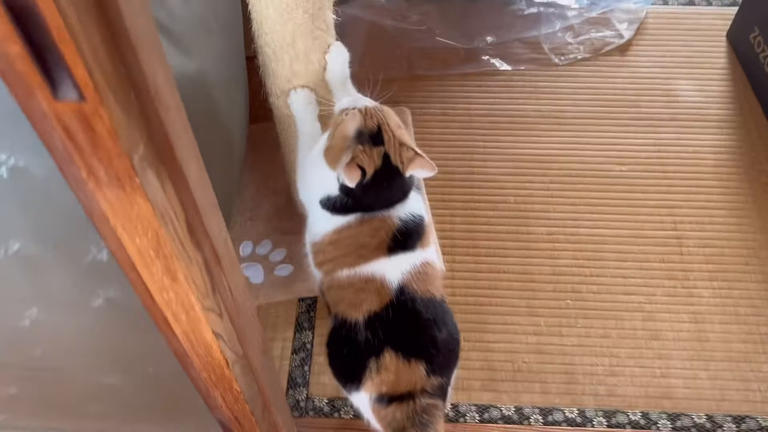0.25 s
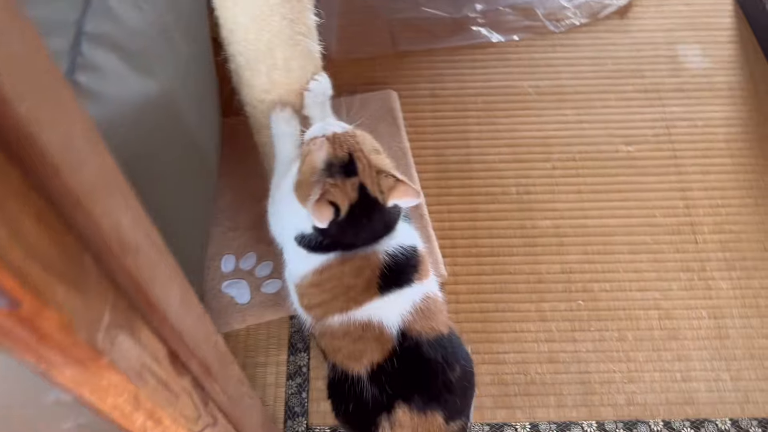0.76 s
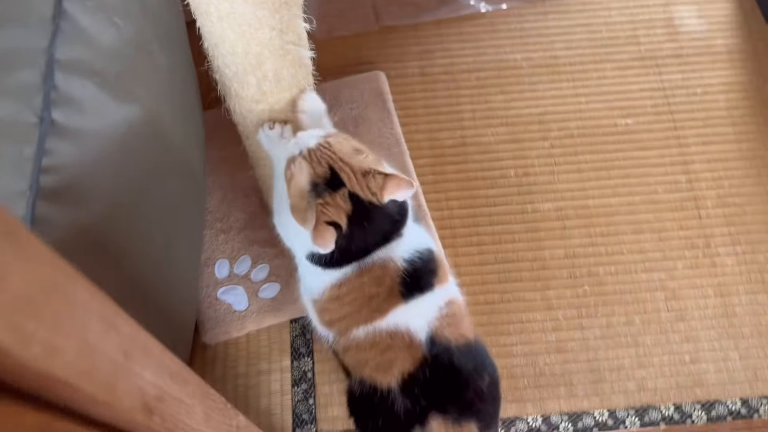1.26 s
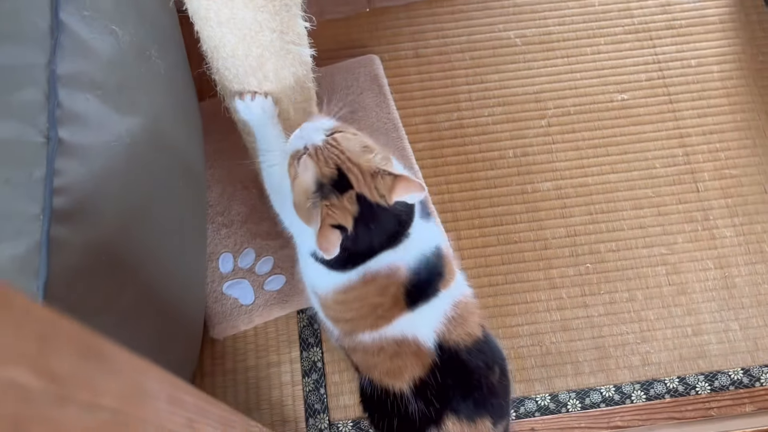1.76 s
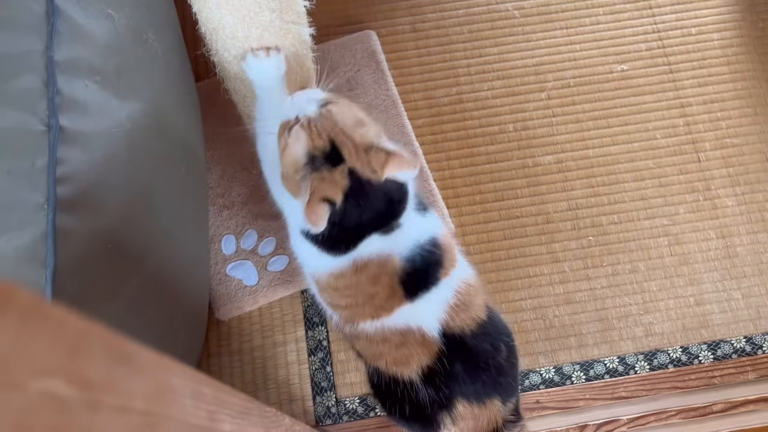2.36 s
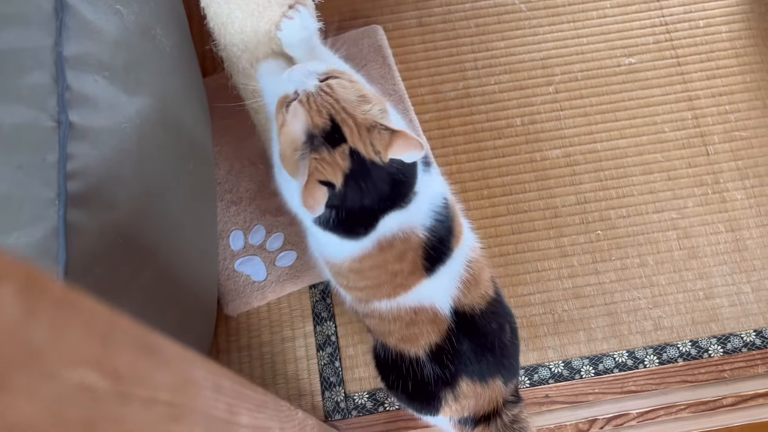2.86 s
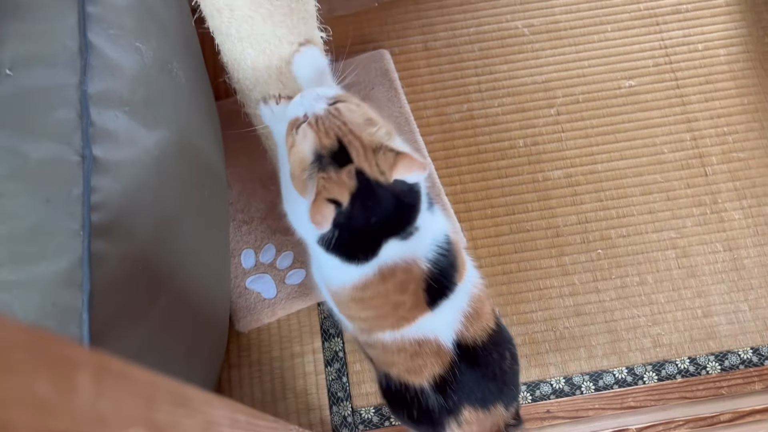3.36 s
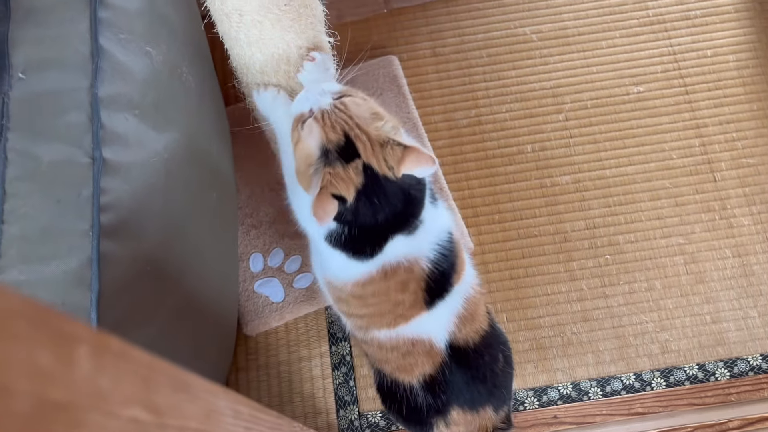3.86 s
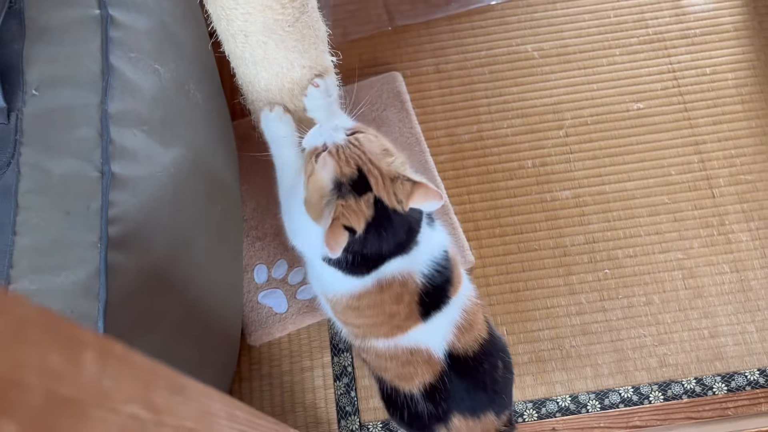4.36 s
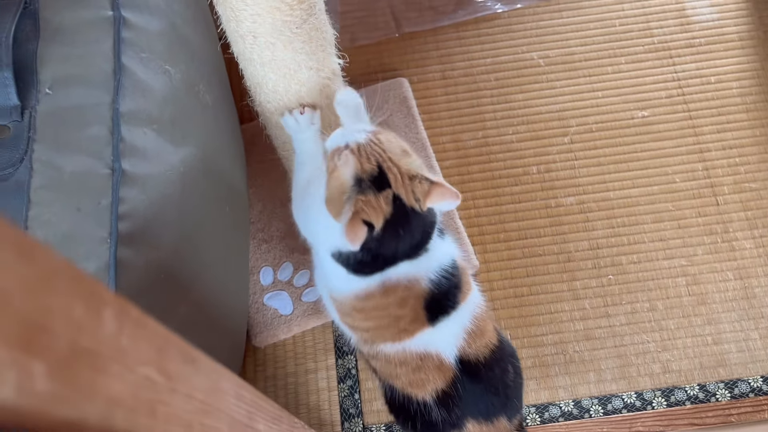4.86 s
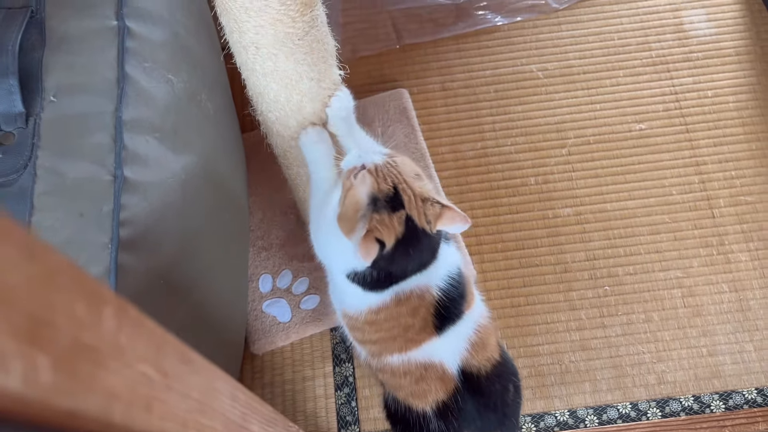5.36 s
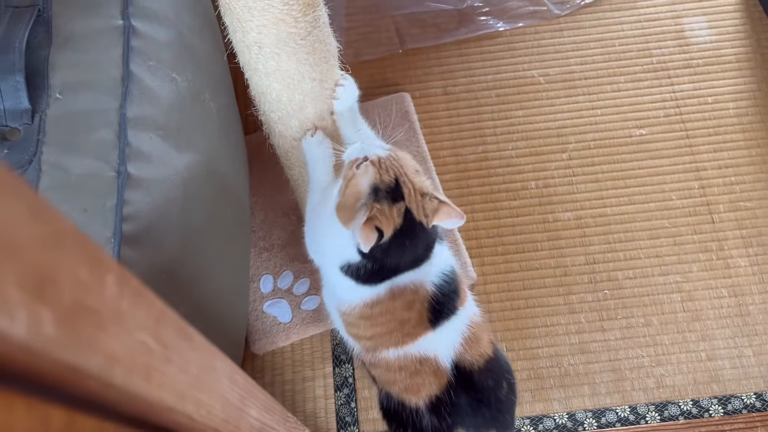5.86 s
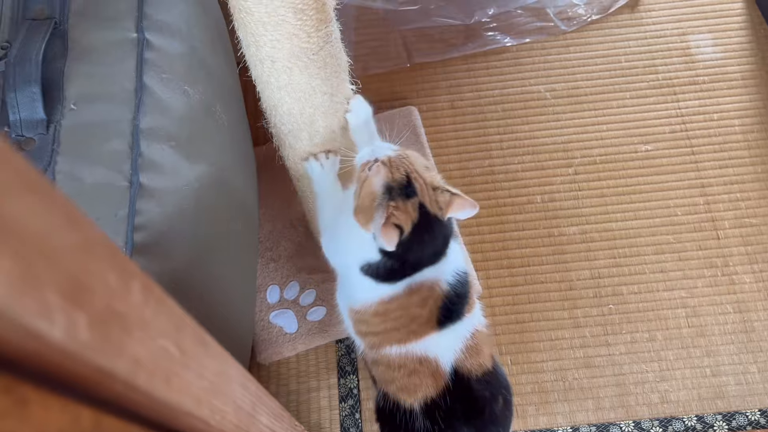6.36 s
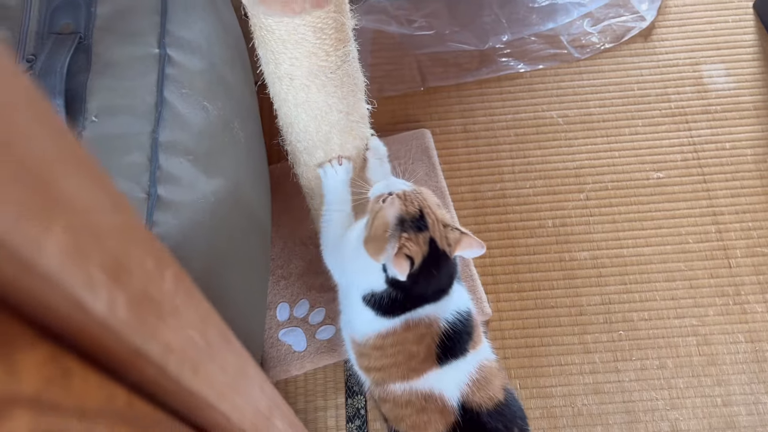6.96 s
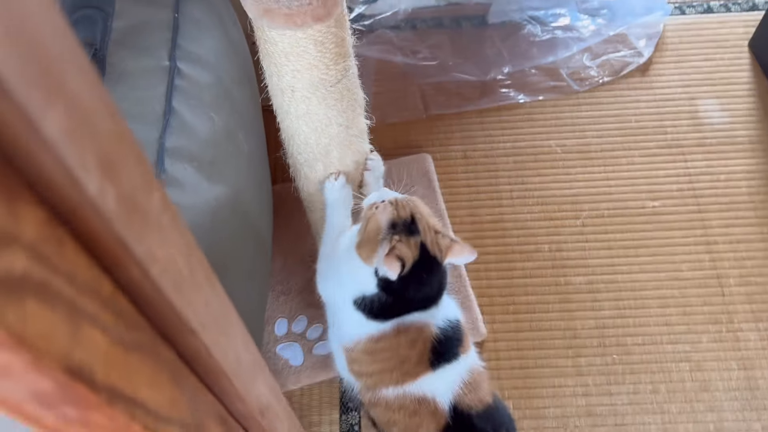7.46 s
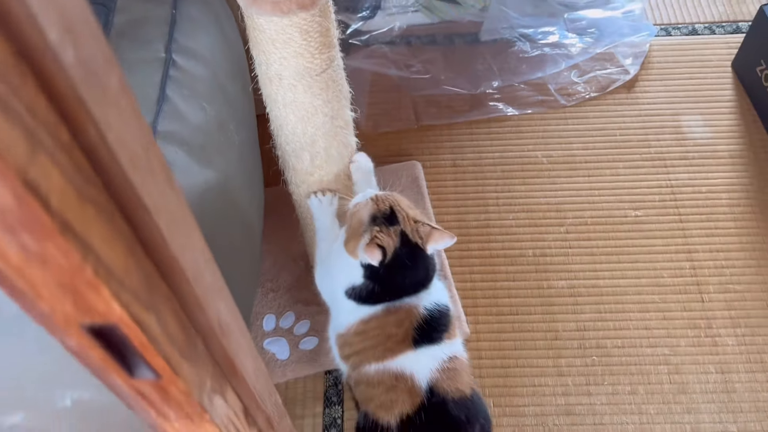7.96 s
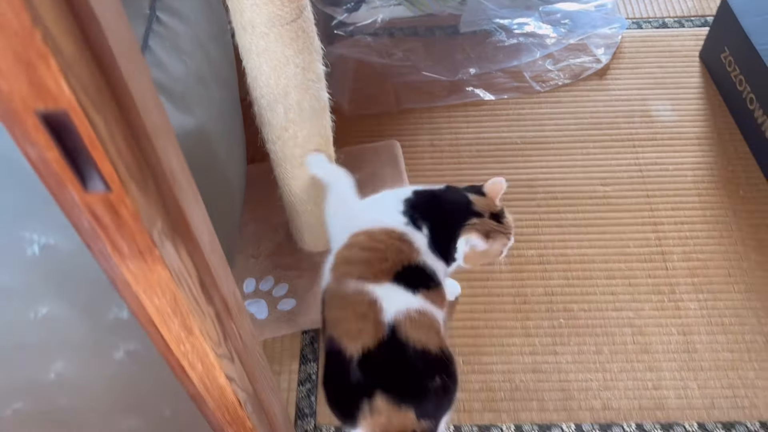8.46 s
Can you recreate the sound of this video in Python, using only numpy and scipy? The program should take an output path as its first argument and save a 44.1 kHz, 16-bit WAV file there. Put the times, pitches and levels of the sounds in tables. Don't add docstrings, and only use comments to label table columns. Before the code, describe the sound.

A cat scratches a rope-wrapped post a metre or two below the listener. Each claw catches, strains and snaps free with a dry hollow pop, followed by short crackling fibre tears and tiny strand clicks. The loose base thuds softly on the matted floor. Strokes come unevenly, busiest around the middle and late part, then stop, leaving faint brushing. Close stereo pickup, small soft room, faint hush.

```python
import sys
import numpy as np
from scipy import signal
from scipy.fft import rfft, irfft, next_fast_len
from scipy.io import wavfile
from scipy.ndimage import uniform_filter1d

SR = 44100
rng = np.random.default_rng(int(sys.argv[2]) if len(sys.argv) > 2 else 0)


def volts_from_db(level):
    exponent = np.asarray(level, float) / 20
    return 10 ** exponent


def master(y):
    cut = np.clip(np.atleast_2d(y).T, -1, 1)
    pcm = np.round(cut * 32767)
    wavfile.write(sys.argv[1], SR, pcm.astype(np.int16))


N = 383209
TIME = np.arange(N) / SR
SIZE = next_fast_len(N + SR)
FREQ = np.arange(SIZE // 2 + 1) * SR / SIZE

# start_s, snap_db, ring_hz, click_db, click_top_db (top band against click)
STROKES = [(0.045, -28.5, 1707, -39, -10), (0.424, -24.5, 1570, -25.5, -36), (0.749, -31.5, 1280, -40, -27),
           (0.894, -33.5, 1630, -29, -2.5), (1.331, -34.5, 930, -79, 22),
           (1.724, -20.5, 1740, -24.5, -22.5), (1.851, -23.5, 1645, -43.5, 3.5), (2.272, -38, 965, -52, 15),
           (2.736, -37.5, 787, -43, 2.5), (2.976, -28.5, 932, -32, 5), (3.155, -26.5, 858, -38, 2),
           (3.271, -37.5, 3020, -41, -1), (3.991, -32.5, 862, -36, 6), (4.367, -28, 1174, -45, 1),
           (4.708, -25.5, 883, -23, -25.5), (5.143, -31, 883, -35, 4), (5.432, -33.5, 974, -26.5, 4),
           (5.978, -28, 1777, -31, -3.5), (6.073, -38, 1136, -57, -10), (6.413, -25.5, 1724, -31, 0.5),
           (6.628, -32.5, 1590, -34, -1), (7.076, -23, 3770, -31, -8), (7.57, -33.5, 1755, -36.5, 5),
           (7.983, -31, 1600, -36.5, 3.5)]
# rip_length_s, post_db, fibre_db, thud_db, thud_hz
AFTER = [(0.091, -60, -92, -47, 104), (0.079, -54.5, -74, -44, 61), (0.021, -54, -53, -49.5, 61),
         (0.11, -50, -49.5, -41, 85.4), (0.03, -50.5, -56, -47, 110), (0.085, -62, -68, -45, 98),
         (0.081, -48, -51.5, -49, 99), (0.046, -47.5, -54.5, -46, 91), (0.2, -69.5, -83, -43, 34),
         (0.094, -58, -59.5, -50, 55), (0.11, -56.5, -58, -42, 67), (0.052, -51.5, -51, -49, 109),
         (0.066, -63.5, -75, -41, 54), (0.031, -63, -86, -51, 160), (0.042, -50, -57, -45, 50.6),
         (0.048, -55.5, -93, -48, 120), (0.053, -58.5, -62, -44.5, 59), (0.077, -59, -84, -46.5, 26),
         (0.045, -68, -62.5, -50, 91), (0.09, -54, -61.5, -39.5, 28), (0.033, -61, -80, -44, 130),
         (0.076, -60, -74, -46, 48), (0.048, -53, -88, -48.5, 110), (0.07, -59, -68, -46, 66)]
# post_jolt_db, base_jolt_db, click_bright_db, second_claw_db, rip_creak_db
GRIP = [(0, -1, -4.5, -7, 0), (0, 0, 0, -1, -1), (0, -8.5, 4, 4, 3.5), (0, -6, -1.5, 5, -3.5),
        (0, -4.5, 1, -1, 1.5), (3, -8, -8, -1, -7), (0, -7, 4.5, -4.5, -1), (0, 5, 15.5, -6, -4),
        (0, 4.5, 6, -9, 2.5), (0, -6.5, -7.5, -4.5, -7), (0, -2.5, 10, -2, -5), (0, 7.5, 5, -1, -2),
        (3, 6, -1, -5, 10.5), (0, 0, -3, -9, -1), (3, -4, -3, -4.5, 3), (0, -4, -8, -6, -0.5),
        (0, 4, 9, -11, -1), (0, 0.5, -7, -3, -3.5), (0, 4, 4, -1, -7), (0, 0.5, 1.5, 3, -1.5),
        (0, -7.5, -3, 0.5, 7), (3, 7, -5, 6, -3), (3, 4, -8, 6.5, 0.5), (0, 2.5, 8.5, -3, 3.5)]
# start_s, snap_db, ring_hz, drag_length_s, fibre_db
CATCHES = [(0.16, -52, 840, 0.033, -69), (0.684, -50.5, 1320, 0.064, -72), (1.441, -55.5, 870, 0.023, -71),
           (1.563, -54, 1030, 0.016, -87), (1.58, -50.5, 2950, 0.022, -66),
           (1.639, -54.5, 1250, 0.08, -66.5), (1.835, -53, 1300, 0.011, -71),
           (1.999, -47, 3830, 0.023, -60.5), (2.09, -46.5, 930, 0.044, -78), (2.255, -56, 920, 0.022, -71),
           (2.405, -49, 916, 0.015, -79), (2.637, -49.5, 1590, 0.1, -69), (3.283, -34.5, 1250, 0.013, -71),
           (3.707, -42, 2640, 0.008, -55), (3.942, -60, 1280, 0.022, -70), (5.788, -45.5, 1280, 0.039, -67),
           (5.88, -42, 1250, 0.052, -60), (6.242, -47, 3600, 0.1, -69), (6.425, -26, 1377, 0.022, -79),
           (6.521, -42, 3770, 0.094, -84), (6.634, -37, 1717, 0.012, -73),
           (6.972, -47.5, 3540, 0.031, -66.5), (7.052, -44.5, 1240, 0.021, -79)]
# start_s, snap_db, ring_hz
SKIPS = [(.905, -37, 1220), (.896, -37, 1580), (.945, -36, 1100), (.949, -30, 930), (1.854, -31, 2100),
         (1.878, -31, 1000), (1.905, -33.5, 890), (1.925, -29.5, 1790), (1.333, -39, 820),
         (7.078, -28.5, 3400), (3.31, -46, 1300), (3.288, -32.5, 1220), (3.296, -31, 1300),
         (3.338, -41, 800), (.424, -31, 3540), (4.709, -27, 3200)]
# start_s, length_s, fibre_db, post_db, swell_db
RUBS = [(0.01, 8.07, -81.5, -87.5, -5.5), (8.08, .6, -92, -92, 8), (5.791, .01, -62, -64, 0),
        (4.195, .025, -70, -82, 0), (3.486, 0.28, -93, -86.5, 5), (0.21, 0.17, -76, -81.5, 10),
        (0.812, 0.065, -75, -76, -14), (1.269, 0.051, -69, -75.5, -2), (1.402, 0.084, -75, -77, -10),
        (2.875, .085, -89, -67.5, 6), (3.097, 0.044, -63.5, -63.5, -4), (3.856, 0.14, -71.5, -75.5, 7),
        (4.127, .16, -73.5, -78, 2), (4.424, 0.061, -72.5, -75, 16.5), (4.563, 0.11, -78, -80, 11.5),
        (4.799, 0.031, -66, -67, -18), (4.918, .12, -67, -72, 5), (5.104, 0.031, -72, -82.5, 3),
        (5.683, 0.045, -63, -67.5, 10), (6.904, 0.068, -72.5, -78.5, -6), (7.279, 0.042, -66, -70, 2),
        (8.33, 0.046, -93, -94, 2), (6.191, .05, -78.5, -90, -4), (8.379, 0.048, -67, -72, 7),
        (8.437, 0.046, -62.5, -67, -7), (8.475, 0.073, -77, -87, -7), (8.55, 0.19, -82.5, -85, 9),
        (2.155, 0.038, -99, -98, -9), (5.497, 0.031, -94, -91, -9), (7.552, 0.018, -68, -68, 10),
        (7.085, 0.041, -74, -76, -10)]
# start_s, length_s, post_db, fibre_db, creak_db (in the base)
LEANS = [(0.498, 0.13, -70.5, -82, -68), (2.33, 0.064, -68, -78, -73), (2.417, 0.23, -73.5, -104, -77.5),
         (2.693, 0.1, -79, -80, -77), (3.36, 0.11, -74, -72, -77), (5.22, 0.066, -90, -73, -85),
         (5.374, 0.092, -78, -68, -66.5), (6.35, 0.053, -68, -61.5, -62), (6.495, 0.11, -56, -61.5, -56.5),
         (6.666, 0.1, -75.5, -94, -63), (7.154, 0.051, -78, -75, -71), (7.342, .1, -75.5, -73.5, -73),
         (7.454, 0.039, -97, -108, -66), (2.89, 0.066, -66.5, -90, -73), (4.764, 0.082, -70, -82, -62.5),
         (7.624, 0.047, -68, -81, -68), (3.552, 0.11, -94, -95, -72), (1.983, 0.022, -61, -62, -75),
         (2.092, 0.015, -65, -74, -72), (2.86, .08, -74, -90, -85), (7.664, 0.11, -68, -71.5, -73),
         (7.876, 0.13, -84, -77, -75.5)]
# start_s, peak_db, top_db (top band against peak)
TICKS = [(0.411, -56.5, 9.5), (0.824, -44.5, -3), (1.841, -47, 3), (2.282, -37, -34), (2.813, -52, -1),
         (3.1397, -54.5, 3), (3.2038, -40.5, -11), (2.9708, -50.5, 5), (4.804, -40.5, -1), (5.8715, -52, 6),
         (5.902, -55, 4), (6.08, -47, -6), (6.292, -60, 0), (6.428, -18.5, -18), (6.536, -42, -4),
         (7.194, -58, 2), (7.439, -57.5, -1), (8.035, -74, 18), (8.165, -78, 7),
         (0.3366, -55, 0), (1.8344, -41.5, -5), (2.0018, -43, -11.5), (2.1071, -54, 2), (2.1154, -52.5, 3),
          (2.1555, -71, -4), (2.1635, -59, 2), (2.2159, -76, -2.5), (3.1083, -53, -4), (3.1577, -25.5, 4.5),
          (3.929, -66, 5), (3.633, -76, 12), (4.4383, -65, 0), (4.4787, -53, -6), (4.6359, -58, 2.5),
          (4.7124, -26.5, -2.5), (4.9282, -68, 3), (5.006, -60, -2), (5.1108, -63, 3), (5.255, -63, 8),
          (5.5244, -61, 2), (5.728, -59, -2), (5.7698, -65, 0), (6.2765, -61, -6), (6.5204, -50, -8.5),
          (6.5514, -49, -2), (6.6065, -50, -10), (6.6374, -42, -8), (6.791, -68, 7), (6.9132, -68, 2),
          (7.2898, -69, 0), (7.3128, -63, 5), (8.0494, -72, -4), (8.118, -66, -2), (8.4437, -60, -4)]
# start_s, length_s, pitch_hz,
# level_db
SQUAWKS = [(0.936, 0.017, 951, -45.5), (0.984, 0.013, 1090, -54), (.897, 0.0066, 1150, -45),
           (1.742, 0.027, 1720, -52), (0.939, 0.025, 1726, -50), (0.948, 0.048, 1334, -51),
           (0.972, 0.017, 1090, -48), (1.006, 0.031, 884, -59.5), (1.865, 0.036, 934, -49),
           (1.897, 0.025, 930, -48.5), (1.913, 0.027, 1620, -50), (2.271, 0.06, 951, -44.5),
           (2.288, 0.041, 990, -60), (3.285, 0.023, 1245, -48.5), (3.295, 0.024, 1614, -54),
           (6.418, 0.024, 202, -47), (6.428, 0.027, 497, -46), (6.543, .03, 369, -49.5),
           (6.652, 0.067, 563, -62), (6.69, .045, 980, -73), (2.746, 0.03, 223, -51.5),
           (2.985, 0.017, 892, -54), (3.163, 0.016, 872, -48), (4.713, 0.045, 500, -48),
           (1.338, 0.021, 992, -52.5), (7.078, 0.017, 230, -49), (7.103, 0.016, 198, -49),
           (6.343, .022, 7700, -70), (6.246, .007, 1400, -54), (6.304, .005, 3600, -64),
           (6.322, .006, 3700, -65), (6.532, .01, 3900, -47), (6.549, .007, 3800, -52),
           (6.603, .008, 3500, -56), (4.711, .014, 1220, -49), (3.888, .005, 1900, -66),
           (7.487, 0.038, 452, -63.5), (7.493, 0.052, 320, -65)]
# start_s, peak_db, pitch_hz
THUDS = [(0.191, -55, 57), (0.388, -47.5, 51.6), (1.677, -56, 52), (2.109, -57, 97), (3.178, -44, 62),
         (3.506, -78, 76), (5.4, -47.5, 92.4), (4.381, -49.5, 46), (5.154, -48.5, 46.5), (5.819, -60, 98),
         (6.372, -49.5, 62.7), (6.441, -34.5, 66.4), (6.517, -32, 47.4), (6.512, -35.5, 93.8),
         (6.532, -31, 95), (7.167, -45.5, 57.6), (7.34, -52, 84), (7.364, -50, 84), (7.735, -60, 68.6),
         (8.439, -64.5, 114), (8.545, -61, 89.5), (8.572, -44.5, 85.8), (8.627, -58, 85)]
# time_s, level_db
SWAY = [(0.0, -68), (1.67, -74), (1.86, -53.5), (2.15, -71.5), (2.9, -68), (3.06, -78), (3.29, -65),
        (3.65, -75), (4.11, -72.5), (6.36, -67.5), (6.58, -51.5), (6.75, -62.5), (8.52, -73.5), (8.69, -73)]
# pitch_hz, width_hz, level_db
POST = [(526, 100, -7.5), (933, 318, -2.5), (1250, 105, 4), (1630, 444, 1), (2210, 1320, -5),
        (3683, 1070, -5.5)]
# pitch_hz, level_db (per Hz)
FIBRE = [(1800, -27.5), (2400, -10.5), (3500, 4), (5000, -6.5), (7000, -8.5), (9000, -5), (11000, -0.5),
         (13000, -6.5), (15000, -5), (16800, -19.5), (17200, -66.5)]
# pitch_hz, width_hz, level_db
BASE = [(158.4, 68, -1), (226.9, 52, 0), (320, 74, -6), (498.7, 113, -5.5)]
# pitch_hz, t60_s (time to fall 60 dB), share_db (of reflections)
ROOM = [(61.4, 0.35, 1.5), (131, 0.34, -3.5), (334, 0.4, -1.5), (734, 0.19, 1), (1944, 0.2, -7),
        (4200, 0.23, -7), (8800, 0.23, -9), (13700, 0.13, -29.5)]
# pitch_hz, level_db (per Hz)
HUSH = [(30, -4), (70, 3), (150, -2.5), (400, -8), (1500, -23), (4000, -33.5), (8000, -36.5),
        (13000, -27.5), (16000, -30.5)]
# pitch_hz, lead_radians
LEAD = [(0, 0), (430, -0.2), (1890, 1.0), (3880, 0.5), (5680, -1.1), (6290, 0.0), (7490, -0.1),
        (8180, -0.8), (9130, -2.45), (10900, -4.15), (11900, -6.0), (13700, -6.7), (14600, -8.85),
        (16600, -10.3)]
# pitch_hz, level_db
LEAN = [(60, -.8), (110, 0), (200, -1), (380, -1), (700, 1), (1290, -3.5), (2380, 1.5), (4400, 4),
        (8120, -1), (15000, -.6)]
# pitch_hz, level_db
APART = [(30, -24), (60, -14), (150, -7), (400, -2), (1500, 4), (4000, 5), (6500, -5), (9000, -19),
         (11000, -19), (13000, -17)]

RIP_LAG_S, THUD_LAG_S, CLICK_LAG_S = 0.0039, .014, .0005
RIP_FADE, RIP_CREAK_DB = 0.69, -1.5
CATCH_POST_DB, CATCH_CREAK_DB, CATCH_FADE_DB, CATCH_CLICK_DB, CATCH_TOP_DB = -20.5, -24, -16.5, -11, 0.5
CATCH_POST_JOLT_DB, CATCH_BASE_JOLT_DB = 0.012, 0.0052
SKIP_POST_DB, SKIP_BASE_DB = -3, -6.5
RUB_CREAK_DB, LEAN_FADE_DB = -7.5, -4.5
STRAIN_S, STRAIN_DB = 0.0059, -30.5
SECOND_CLAW_S, SECOND_CLAW_SPREAD_S, SECOND_CLAW_DB = 0.0079, 0.0036, -18.5
ROCK_HZ, ROCK_DB = 46, -9
TAIL_TURNS_HZ = 2.9
HUSH_DB = -71.5


def on_freq(table):
    hz, value = np.transpose(table)
    return np.interp(np.log(FREQ + 1), np.log(hz + 1), value)


def shape(x, gain):
    return irfft(rfft(x, SIZE) * gain, SIZE)[..., :N]


def modes(table):
    total = 0
    for k, (hz, width, db) in enumerate(table):
        damping = 1j * FREQ * width
        total = total + (-1) ** k * volts_from_db(db) * damping / (hz ** 2 - FREQ ** 2 + damping)
    return total


def unit(x):
    return x / np.sqrt(np.mean(x ** 2))


def add(out, s, sound):
    i = int(s * SR)
    out[..., i:i + sound.shape[-1]] += sound[..., :N - i]


def crackle(rate, scatter_db, bed):
    happens = rng.random(N) < rate / SR
    size = volts_from_db(scatter_db * np.minimum(rng.exponential(size=N), 3))
    breaks = happens * rng.standard_normal(N) * size
    return unit(breaks) + bed * rng.standard_normal(N)


def flutter(rate, depth_db):
    k = int(SR / rate)
    steps = np.repeat(rng.standard_normal(N // k + 1), k)[:N]
    return volts_from_db(depth_db * uniform_filter1d(steps, k // 2))


def snaps():
    rings, post, foot = np.zeros((3, 2, N))
    t = np.arange(int(.06 * SR)) / SR
    claws = STROKES + CATCHES + SKIPS
    grips = (GRIP + [(CATCH_POST_JOLT_DB, CATCH_BASE_JOLT_DB)] * len(CATCHES)
             + [(SKIP_POST_DB, SKIP_BASE_DB)] * len(SKIPS))
    wobbles = rng.standard_normal((len(claws), len(t)))
    for (s, db, hz, *_), (post_db, foot_db, *_), wobble in zip(claws, grips, wobbles):
        side = volts_from_db(np.array([[.8], [-.8]]) * wobble[-1])
        rough = 1 + 2.5 * uniform_filter1d(wobble, size=24)
        ring_s = .0019 + 1 / hz
        envelope = (1 - np.exp(-t / 0.0012)) * np.exp(-t / ring_s)
        add(rings, s, side * volts_from_db(db) * rough * envelope * np.sin(2 * np.pi * hz * t))
        thinness = (1200 / hz) ** .5
        jolt = side * volts_from_db(db) * thinness * wobble * np.exp(-t / 0.004)
        add(post, s, volts_from_db(post_db) * jolt)
        add(foot, s, volts_from_db(foot_db) * jolt)
    late = np.exp(-2j * np.pi * FREQ * 0.006324)
    post_ring = shape(post, volts_from_db(5) * modes(POST))
    base_ring = shape(foot, volts_from_db(10.0) * late * modes(BASE))
    return volts_from_db(-1.0) * rings + post_ring + base_ring


def clicks():
    waits = SECOND_CLAW_S + SECOND_CLAW_SPREAD_S * (np.arange(len(STROKES)) * 0.38 % 1)
    first, second = [], []
    for (s, _, _, db, top), grip, wait in zip(STROKES, GRIP, waits):
        first.append((s + CLICK_LAG_S, db, top, grip[2]))
        second.append((s + wait, db + SECOND_CLAW_DB + grip[3], top, grip[2]))
    hooks = [(s, db + CATCH_CLICK_DB, CATCH_TOP_DB, 0) for s, db, *_ in CATCHES]
    return first + second + hooks + [(*row, 0) for row in TICKS]


def ticks():
    bands, strands = np.zeros((3, 2, N)), clicks()
    spread = np.array([.2, .4, 1.5])[:, None, None] * np.array([[1], [-1]])
    t = np.arange(int(0.011 * SR)) / SR
    grits = rng.standard_normal((len(strands), len(t)))
    for (s, db, top_db, bright_db), grit in zip(strands, grits):
        fade_s = 0.00088 if db > -45 else .0022
        burst = np.sign(grit) * np.exp(-t / fade_s) * (np.abs(grit) > 1)
        band_db = db + np.array([[[-bright_db]], [[bright_db]], [[top_db]]])
        add(bands, s, volts_from_db(band_db) * (1 + spread * np.tanh(2 * grit[-1])) * burst)
    rings = [(3500, 4500, 9), (6300, 4500, 4), (13600, 6000, 10)]  # Hz, width Hz, dB
    heard = 0
    for band, (hz, width, db) in zip(bands, rings):
        heard = heard + rfft(band, SIZE) * volts_from_db(db) * modes([(hz, width, 0)]) ** 2
    return irfft(heard, SIZE)[:, :N]


def drags():
    rips = []
    for (s, snap, *_), (length, post, fibre, *_), grip in zip(STROKES, AFTER, GRIP):
        swell = -RIP_FADE * (snap - post - 8)
        rips.append((s + RIP_LAG_S, length, post, fibre, post + RIP_CREAK_DB + grip[4], swell))
    hooks = [(s, length, snap + CATCH_POST_DB, fibre, snap + CATCH_CREAK_DB, CATCH_FADE_DB)
             for s, snap, _, length, fibre in CATCHES]
    rubs = [(s, length, post, fibre, post + RUB_CREAK_DB, swell) for s, length, fibre, post, swell in RUBS]
    return rips + hooks + rubs + [(*row, LEAN_FADE_DB) for row in LEANS]


def tearing():
    pull = np.zeros((3, N))
    for s, length, post_db, fibre_db, creak_db, swell_db in drags():
        t = np.arange(int((length + .1) * SR)) / SR
        onset_s = .004 if swell_db < -6 else .016
        grip = np.clip(t / onset_s, 0, 1) * volts_from_db(swell_db * (np.minimum(t / length, 1) - .5))
        release = np.exp(-np.clip(t - length, 0, None) / 0.019)
        levels = volts_from_db(np.array([[post_db], [fibre_db], [creak_db]]) - 1.5)
        add(pull, s, levels * grip * release)
    force = np.clip((20 * np.log10(pull[:2].max(axis=0) + 1e-9) + 80) / 22, .25, 1.)
    drag = crackle(2500, 3., .65) * flutter(90, 3.) ** force
    bodies = modes(POST), volts_from_db(on_freq(FIBRE)), modes(BASE) ** 2
    return sum(effort * unit(shape(drag, body)) for effort, body in zip(pull, bodies))


def strain():
    load, t = np.zeros(N), np.arange(int(0.023 * SR)) / SR
    for s, db, *_ in STROKES:
        add(load, s - .02, volts_from_db(db + STRAIN_DB) * np.exp((t - .02) / STRAIN_S))
    rope = modes([(1500, 640, 7.5), (4600, 5700, -3.0)])
    return load * unit(shape(crackle(3000, 3.9, 0.96), rope))


def squawks():
    out, grip, waver = np.zeros(N), flutter(160, 3.), np.log(flutter(200, .2))
    for s, length, hz, db in SQUAWKS:
        t = np.arange(int(length * SR)) / SR
        i = int(s * SR) + np.arange(len(t))
        envelope = np.sin(np.pi * t / length) ** 0.19
        tone = np.sin(2 * np.pi * np.cumsum(hz * (1 + waver[i])) / SR)
        add(out, s, volts_from_db(db + 1.5) * envelope * grip[i] * tone)
    return out


def base():
    out, t = np.zeros(N), np.arange(int(.4 * SR)) / SR
    jerked = [(stroke[0] + THUD_LAG_S, db, hz) for stroke, (*_, db, hz) in zip(STROKES, AFTER)]
    rocked = [(s, db + ROCK_DB, ROCK_HZ) for s, db, _ in jerked]
    for s, db, hz in jerked + rocked + THUDS:
        envelope = (1 - np.exp(-t / 0.0077)) ** 2 * volts_from_db(-60 * t / 0.12)
        add(out, s, volts_from_db(db + 11.5) * envelope * np.sin(2 * np.pi * hz * t))
    rocking = rng.standard_normal(N) * flutter(14, 5.5)
    rumble = unit(shape(rocking, modes([(46.9, 54, -1.3), (100.4, 49.5, -0.47)]) ** 2))
    sway = volts_from_db(np.interp(TIME, *np.transpose(SWAY)) + 2.5)
    shake = uniform_filter1d(np.abs(out), size=300) * volts_from_db(-22.0)
    creak = unit(shape(rng.standard_normal(N), modes(BASE) ** 2))
    return out + rumble * sway + shake * creak


def room(x):
    t = np.arange(SR // 2) / SR
    bin_hz = np.arange(len(t) // 2 + 1) * 2 + 1
    tail = 0
    for hz, t60, db in ROOM:
        band = np.exp(-np.log2(bin_hz / hz) ** 2 / .5)
        fade = volts_from_db(-60 * t / t60) * np.clip((t - .003) / 0.0013, 0, 1)
        noise = irfft(rfft(rng.standard_normal((2, 2, len(t)))) * band)
        tail = tail + noise * fade * volts_from_db(db) / np.sqrt(np.sum(fade ** 2))
    turn = 2 * np.pi * TAIL_TURNS_HZ * TIME
    first = shape(x * np.cos(turn), rfft(tail[0], SIZE))
    second = shape(x * np.sin(turn), rfft(tail[1], SIZE))
    return first + second


def hush():
    drift = flutter(9, 2.2)
    noise = unit(shape(rng.standard_normal((2, N)), volts_from_db(on_freq(HUSH))))
    return volts_from_db(HUSH_DB) * noise * drift


def scene():
    dry = snaps() + ticks() + tearing() + base() + strain()
    slips = squawks()
    return dry + slips + room(dry.mean(axis=0) + .5 * slips) + hush()


def band_limit(x):
    return signal.sosfilt(signal.butter(12, 16900, fs=SR, output="sos"), x)


def record(dry):
    mid = (dry[0] + dry[1]) / 2
    side = shape((dry[0] - dry[1]) / 2, volts_from_db(on_freq(APART)))
    edges = 1 / (1 + (32 / (FREQ + 1)) ** 4) / (1 + (FREQ / 16300) ** 70)
    lead = np.interp(FREQ, *np.transpose(LEAD))
    turn = volts_from_db(on_freq(LEAN) / 2) * np.exp(.5j * lead)
    ports = np.array([shape(mid + side, edges * turn), shape(mid - side, edges / turn)])
    return band_limit(ports)


dry = scene()
out = record(dry)
master(out)
```